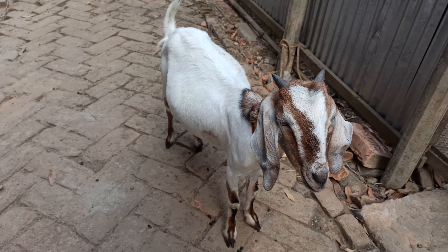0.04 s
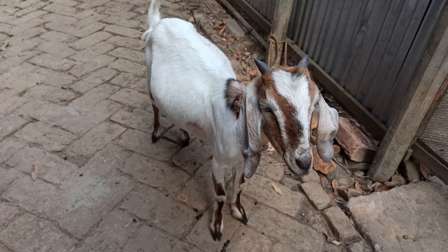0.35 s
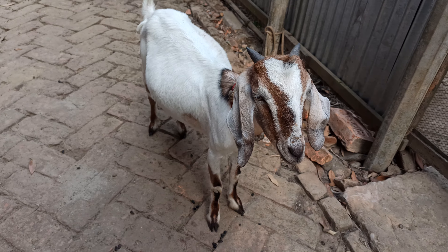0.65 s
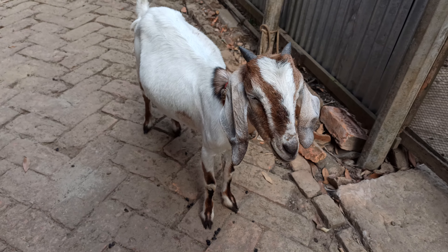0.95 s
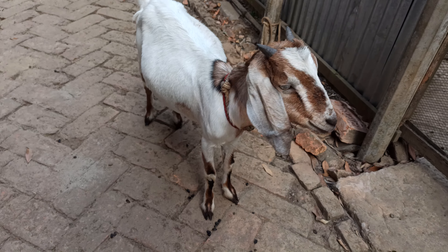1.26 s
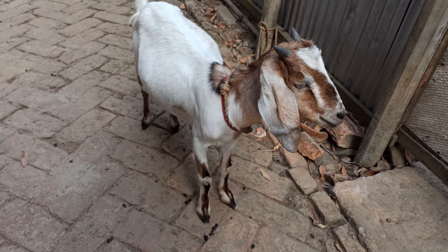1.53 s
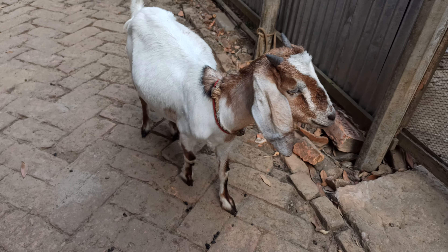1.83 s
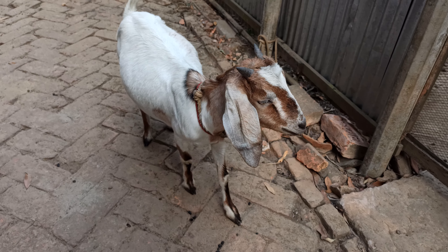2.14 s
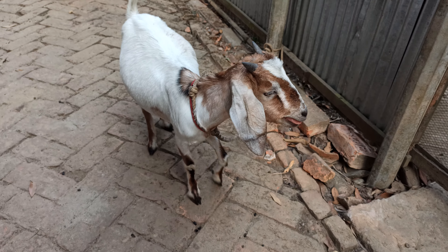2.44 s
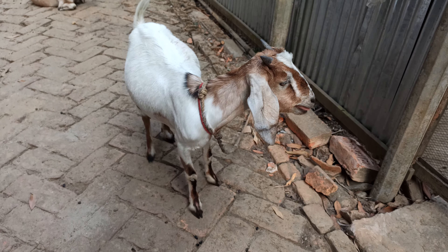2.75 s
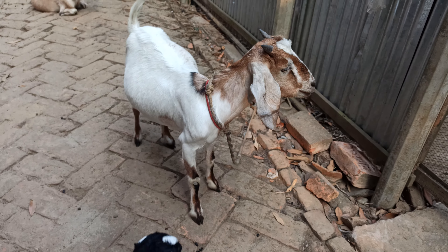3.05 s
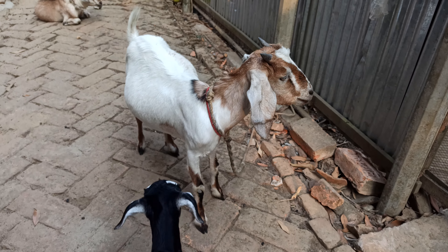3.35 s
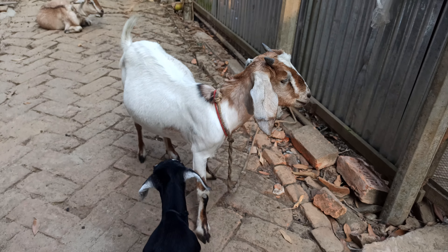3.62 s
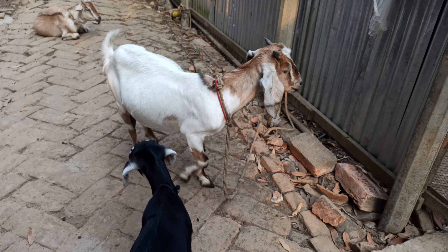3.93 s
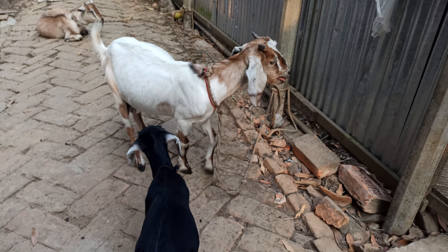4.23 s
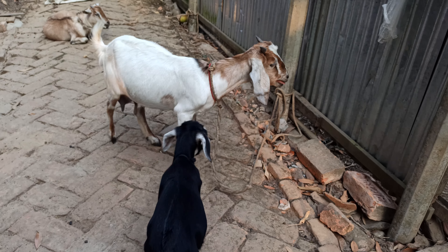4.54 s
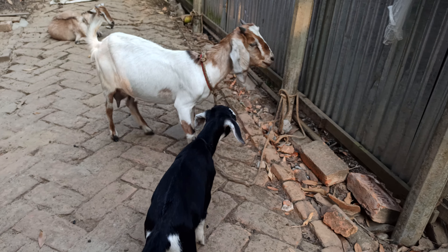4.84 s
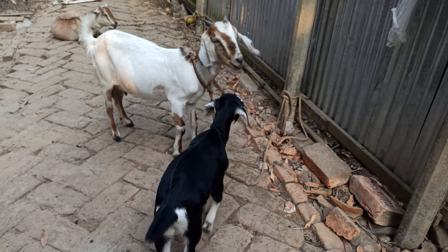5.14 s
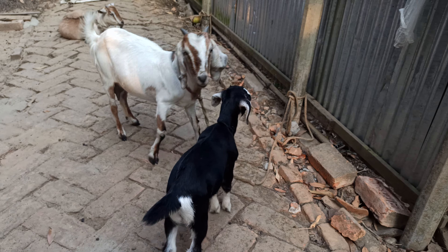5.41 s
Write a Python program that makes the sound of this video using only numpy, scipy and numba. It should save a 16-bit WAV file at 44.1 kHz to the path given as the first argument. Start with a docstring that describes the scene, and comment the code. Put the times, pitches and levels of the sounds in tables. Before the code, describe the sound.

Birds chirp and metal clinks lightly in a yard, then a nearby goat gives two quavering bleats.

```python
"""Goat in a brick-paved yard

A goat bleats twice, close to a hand-held phone. Each bleat is an arch of pitch shaken by a quaver,
which sweeps harmonics through the throat resonances as the mouth opens. Small birds twitter in gliding
notes, a bit of metal rings in short clinks, and hooves scuff and tap the bricks.
A low, distant rumble lies under it all, nearly alike at the phone's two microphone ports."""
import sys
import numpy as np
from scipy import signal
from scipy.fft import rfft, irfft, next_fast_len
from scipy.io import wavfile
from scipy.ndimage import uniform_filter1d
from numba import njit

SR = 44100
rng = np.random.default_rng(int(sys.argv[2]) if len(sys.argv) > 2 else 0)


def waveform_to_disk(signal):
    """Save audio, clipped to [-1, 1], as 16-bit WAV at the path in sys.argv[1]."""
    frames = np.transpose(np.atleast_2d(signal))
    scaled = np.clip(frames, -1, 1) * 32767
    samples = np.round(scaled).astype(np.int16)
    wavfile.write(sys.argv[1], SR, samples)


N = 246078
TIME = np.arange(N) / SR

# distant rumble and hiss: (frequency [Hz], relative level [dB])
AIR_COLOUR = [(15, -74.5), (25, -37), (101, -1.5), (183, -5), (281, -2.5), (322, -7.5), (410, -3.5),
              (445, -10), (919, -17), (1900, -26), (3930, -25.5), (5010, -31.5), (7500, -24), (9300, -43.5),
              (15500, -33)]
# how alike they are at the two ports: (frequency [Hz], correlation [0-1])
AIR_LIKENESS = [(50, 0.94), (500, 0.79), (1200, 0), (3000, 0), (15000, 0.015)]
# hooves dragging grit over the bricks: (time [s], decay time [s], level [dB])
SCUFFS = [(0, 0.037, -34.5), (.009, 0.0077, -26.5), (0.132, 0.0025, -29.5), (0.281, 0.027, -44.5),
          (0.328, 0.0061, -41), (0.624, 0.015, -42), (0.847, 0.0052, -41), (1.006, 0.005, -41),
          (2.056, 0.0057, -45), (2.085, 0.014, -42), (2.882, 0.029, -41), (3.441, 0.011, -51.5),
          (3.853, 0.0054, -44), (4.758, 0.0074, -47.5), (4.902, 0.03, -46.5), (4.959, 0.027, -47.5),
          (4.982, 0.017, -46)]
# spectrum of the grit: (frequency [Hz], relative level [dB])
GRIT_COLOUR = [(300, -12), (1000, -23), (2000, -11), (4000, 5), (5200, -4), (7000, 8.5), (9000, -6.5),
               (15000, -11.5)]
# birdsong, a high and a low note in turn, quick and falling, then slower and rising: (from [s],
# until [s], repeat [s], length [s], start pitch [Hz], end pitch [Hz], level [dB], step per repeat [dB])
SONG = [(0.011, .7, 0.11, 0.045, 7860, 6500, -43, -1), (0.095, .58, 0.097, 0.056, 4550, 4014, -49, 0),
        (0.735, 1.28, 0.2, 0.058, 3980, 4630, -45.5, -3), (0.81, 1.36, 0.23, 0.042, 6360, 6800, -46.5, -4)]
# far-off birds: (time [s], length [s], start pitch [Hz], end pitch [Hz], level [dB], trill spread [Hz])
WHISTLES = [(1.531, 0.26, 4420, 3880, -60, 233), (1.925, 0.12, 4000, 4350, -59.5, 382),
            (4.732, 0.31, 4440, 4417, -59.5, 300.6), (5.083, 0.128, 3910, 3900, -60, 60),
            (5.466, 0.091, 4100, 4180, -62, 148)]
# slight treble lift on the birds: (frequency [Hz], gain [dB])
BIRD_COLOUR = [(4200, 0), (7000, 1)]
# modes of a small metal piece: (frequency [Hz], level [dB], share of the clink's decay time [0-1])
METAL_MODES = [(2970, -24, 1), (3382, -11, 0.58), (3784, -8, 0.25), (4427, -8, 0.33), (6340, -16, 0.62),
               (7160, -27, 0.6), (7500, -20.5, 1), (8500, -20.5, 0.44), (12590, -19.5, 0.74)]
# its clinks: (time [s], level [dB], favoured frequency [Hz], decay time [s], left minus right [dB])
CLINKS = [(0.501, -13, 4740, 0.0048, -2.5), (0.6645, -16, 4290, 0.006, -5), (0.68, -34, 3300, 0.018, -1),
          (0.805, -38.5, 3500, 0.012, -10), (0.857, -37, 4300, 0.0064, -13), (0.898, -37, 3420, 0.011, 7),
          (1.019, -46.5, 3450, 0.018, -3), (1.056, -46.5, 3480, 0.0092, 6), (1.768, -45, 3620, 0.007, -2),
          (2.891, -30.5, 4040, 0.0048, -14), (2.937, -41, 3612, 0.011, -6),
          (3.101, -37.5, 3802, 0.0074, -12), (3.131, -40, 3860, 0.0082, -9), (0.96, -44, 4300, 0.0053, -5),
          (3.6258, -22.5, 4470, 0.0069, -6.5), (3.683, -34, 3730, 0.0065, -7),
          (3.718, -39, 3730, 0.0078, -7), (3.885, -45.5, 3950, 0.01, -10.5),
          (3.904, -48.5, 3620, 0.0093, -7), (3.928, -48, 3800, 0.0072, -8)]
# noise within a clink: (frequency [Hz], relative level [dB])
CRACK_COLOUR = [(1000, -42), (2400, -37), (3100, -4), (4400, -2), (5300, -8), (7200, 3.5), (12000, -1)]
# a hoof set down: (time [s], level [dB])
HOOF_KNOCKS = [(1.869, -55), (3.998, -41), (5.442, -52)]
# its dull spectrum: (frequency [Hz], relative level [dB])
KNOCK_COLOUR = [(200, -16), (800, 8), (1300, 0), (1750, -2), (2600, -10), (4300, -7), (7000, -16),
                (12000, -24)]
# each bleat's arch, before the quaver: (time [s], pitch [Hz], low vowel [dB], bright rasp [dB])
ARCH_1 = [(2.047, 244, -39, -48), (2.089, 262, -36.5, -36.5), (2.138, 264.9, -39.5, -35),
          (2.284, 411, -43.5, -46), (2.38, 453.4, -31, -31.5), (2.477, 465, -25.5, -33.5),
          (2.564, 500.8, -29.5, -32), (2.613, 419.1, -23.5, -25.5), (2.683, 441.8, -25, -32),
          (2.805, 352.6, -35, -34), (2.835, 308.4, -38.5, -48.5), (2.874, 226.4, -39.5, -50)]
ARCH_2 = [(4.02, 274.3, -47.5, -46), (4.096, 340, -39.5, -40.5), (4.122, 397.2, -33, -27.5),
          (4.195, 414.7, -37.5, -20.5), (4.26, 451.1, -37.5, -25), (4.348, 523.6, -30.5, -31.5),
          (4.444, 445.6, -29, -24), (4.481, 418.8, -28, -21), (4.497, 352.7, -41, -23),
          (4.601, 362.4, -32.5, -32.5), (4.64, 319.3, -37, -36.5), (4.675, 238, -33.5, -46.5),
          (4.711, 202.7, -40.5, -59)]
# beats of the quaver, each a squeeze that lifts the pitch: (letting go [s], rise [s], hold [s],
# fall [s], lift [semitones], vowel change [dB], rasp change [dB])
QUAVERS = [(2.17, 0.035, 0.03, 0.018, 3.5, 3.5, 1.5), (2.257, 0.055, 0.0054, 0.02, 4.0, 2, 5.5),
           (2.333, 0.045, 0.0065, 0.045, 4.3, 3.5, 10.5), (2.447, 0.042, 0.016, 0.018, 4.5, -3, 5.5),
           (2.538, 0.026, 0.03, 0.014, 3.3, -7, -4), (2.589, 0.018, 0.0028, 0.012, 3.0, -5, -8),
           (2.648, 0.022, 0.0042, 0.023, 3.4, -6, -9), (2.699, 0.014, 0.0051, 0.025, 1.8, -1, -4),
           (2.766, 0.025, 0.0069, 0.014, 1.1, 1.3, -1.5), (4.073, 0.023, 0.00732, 0.016, 2.5, 5, -4.5),
           (4.15, 0.018, 0.0051, 0.016, 3.7, -5.5, -2.5), (4.237, 0.023, 0.029, 0.014, 3.1, 5.5, -0.8),
           (4.302, 0.027, 0.0099, 0.029, 3.5, 10.5, 1.5), (4.375, 0.02, 0.012, 0.029, 2.6, 4, 0.5),
           (4.417, 0.026, 0.012, 0.014, 4.3, 3, -14.5), (4.471, 0.02, 0.0034, 0.013, 1.5, -1.5, -7.5),
           (4.565, 0.056, 0.036, 0.014, 2.6, 6, -2.5)]
# catches, where the throat nearly shuts: (time [s], half length [s], depth [dB])
CATCHES = [(2.109, 0.017, -21.5), (2.276, 0.01, -14.5), (2.446, 0.0085, -11), (4.208, 0.0063, -4.5),
           (4.247, 0.0045, -5.5), (4.27, 0.005, -3.5), (4.429, 0.0037, -15.5), (4.473, 0.0034, -12)]
# the mouth through each bleat: (time [s], opening [0-1], roughness [0-1], nasal ring [dB],
# nasal resonance [Hz], upper ring [dB], upper throat resonance [Hz])
MOUTH_1 = [(2.049, 0.12, 0.25, -13, 2100, 11, 3750), (2.2, 0.07, 0.11, 10.5, 2155, 5.5, 3320),
           (2.292, 0.02, 0.06, 14.5, 1770, 12.5, 3570.0), (2.32, 0, 0.01, 30, 2120, 10, 4200),
           (2.355, 0, 0.06, 31, 2100, 12, 3560), (2.385, 0.65, 0, 17.5, 2110, 13, 3800),
           (2.42, 0.2, 0, 23.5, 2120, 11, 4100), (2.475, 0.79, 0.01, 11.5, 2240, 3.5, 3200),
           (2.52, 0.27, 0, 19.5, 2260, -2, 3454), (2.562, 0.61, 0, 19, 2170, 3, 3200),
           (2.615, 0.98, 0, 17.5, 2080, 18, 3418), (2.675, 0.77, 0.06, 6, 2230, 8.5, 3990),
           (2.76, 0.99, 0, -0.5, 2237, 4, 3950), (2.809, 0.94, 0, 4, 2244, 2, 3550),
           (2.87, 0.63, 0.24, -5, 2250, -2, 3642)]
MOUTH_2 = [(4.02, 0.14, 0.26, -11, 1760, 7.3, 3740), (4.089, 0.28, 0.29, -18, 1960, 13, 3770),
           (4.125, 0.46, 0.4, 8, 2120, 18, 3470), (4.18, 0.52, 0.31, 10, 2195, 10.6, 3400),
           (4.23, 0.2, 0.18, 13, 2200, 8.9, 3430), (4.27, 0.29, 0.27, 17, 2190, 7.5, 3390),
           (4.32, 0.15, 0.15, 12.5, 2170, 5, 3430), (4.39, 0.28, 0.069, 13.5, 2230, 6, 3700),
           (4.446, 0.64, 0.09, 26, 1920, 9.4, 3100), (4.492, 0.5, 0.26, 13, 2200, 18, 3230),
           (4.541, 0.86, 0.1, 12, 2106, 11.2, 3170), (4.574, 0.76, 0.12, 10, 2192, 9, 3327),
           (4.6, 0.94, 0.22, 13, 2310, 10.4, 3886), (4.71, 0.97, 0.52, -2, 2240, 9.3, 3957)]
# throat colour in each bleat, mouth half open and wide open: (frequency [Hz], gain [dB])
HALF_OPEN_1 = [(280.0, 12), (430.0, 0.5), (560.0, 10.5), (700.0, 0.5), (870.0, -6), (1150.0, 1.6),
               (1400.0, -8.5), (1700.0, 0.5), (2100.0, -19.5), (2600.0, -9.5), (3000.0, -6), (3450.0, -3.5),
               (4100.0, -10.5), (4600.0, -9), (5200.0, -22.5), (7300.0, -12.5), (12000.0, -54),
               (15000.0, -34.5)]
WIDE_OPEN_1 = [(280.0, -38.5), (430.0, -6), (560.0, 4.5), (700.0, 10.5), (870.0, 24.5), (1150.0, -7.5),
               (1400.0, -6.5), (1700.0, -3), (2100.0, -10), (2600.0, -5), (3000.0, -1.5), (3450.0, -8),
               (4100.0, -7), (4600.0, -5.5), (5200.0, -20), (7300.0, -27), (12000.0, -39.5), (15000.0, -43)]
HALF_OPEN_2 = [(280.0, 4.5), (430.0, -9), (560.0, 6), (700.0, 3.5), (870.0, -14.5), (1150.0, 1),
               (1400.0, -17), (1700.0, -3), (2100.0, -3.5), (2600.0, -8.5), (3000.0, -2), (3450.0, -5.5),
               (4100.0, -4), (4600.0, -8), (5200.0, -18), (7300.0, -15), (12000.0, -46), (15000.0, -46)]
WIDE_OPEN_2 = [(280.0, -4), (430.0, -31.5), (560.0, -7), (700.0, 15.5), (870.0, 19), (1150.0, -16),
               (1400.0, -1.5), (1700.0, -8.5), (2100.0, -16), (2600.0, -11), (3000.0, -3), (3450.0, -5),
               (4100.0, -10.5), (4600.0, -5.5), (5200.0, -20), (7300.0, -20.5), (12000.0, -53),
               (15000.0, -45.5)]
# treble sizzle of each bleat: (time [s], level [dB])
SIZZLE_1 = [(2.047, -52), (2.12, -60), (2.145, -40.5), (2.199, -52), (2.24, -47), (2.285, -65), (2.33, -51),
            (2.4, -49), (2.47, -45.5), (2.53, -50), (2.57, -41), (2.61, -45), (2.645, -48), (2.675, -50),
            (2.79, -52.5), (2.87, -54)]
SIZZLE_2 = [(4.02, -52.5), (4.09, -53.5), (4.13, -44), (4.19, -38), (4.27, -42), (4.39, -42.5),
            (4.415, -49), (4.44, -42), (4.47, -47), (4.492, -32.5), (4.53, -47), (4.6, -44), (4.65, -48.5),
            (4.71, -62)]
# shadow between the two ports: (frequency [Hz], left minus right [dB])
PORT_SHADOW = [(300, 1.5), (800, 1), (1300, 4), (2400, 0), (4400, -5), (8000, -4), (15000, -1)]
# the goat's echoes, bright nearby and dull from further off: (frequency [Hz], gain [dB])
NEAR_ECHO = [(500, -17.5), (1000, 3.5), (2000, 1), (4000, -1.5), (8000, -4)]
FAR_ECHO = [(300, -8), (800, -17), (2000, -7.5), (5000, -14)]


def undb(db):
    """Decibels to gain."""
    return 10 ** (np.asarray(db) / 20)


def unit(x):
    """Scale to rms 1."""
    return x / np.sqrt(np.mean(x ** 2))


def shape_at(hz, points):
    """Read (frequency, value) points on a log-frequency axis."""
    f, value = np.transpose(points)
    return np.interp(np.log(hz + 1), np.log(f), value)


def filtered(x, gain):
    """Filter by a gain that is a function of frequency."""
    size = next_fast_len(x.shape[-1] + 4096)
    return irfft(rfft(x, size) * gain(np.fft.rfftfreq(size, 1 / SR)), size)[..., :x.shape[-1]]


def colour(x, points):
    """Filter by a table of (frequency [Hz], gain [dB])."""
    return filtered(x, lambda hz: undb(shape_at(hz, points)))


def wander(n, rate):
    """Smooth random drift with spread 1 that changes about rate times a second."""
    return unit(filtered(rng.standard_normal(n), lambda hz: 1 / (1 + (hz / rate) ** 2)))


def add(out, s, x):
    """Mix x into out from time s on."""
    i = max(int(s * SR), 0)
    out[..., i:i + x.shape[-1]] += x[..., :N - i]


def yard(x, t60, gap_s):
    """Scattered echoes from paving, fence and walls, different at each port."""
    t = TIME[:SR]
    tail = rng.standard_normal((2, SR)) * undb(-60 * t / t60) * (t > gap_s)
    tail /= np.sqrt(np.sum(tail ** 2, axis=1, keepdims=True))
    return signal.fftconvolve(np.atleast_2d(x), tail, axes=1)[:, :N]


def background(air_db=-50.5, drone_hz=113, drone_db=-59.5):
    """Distant rumble, nearly alike at both ports, with a faint low drone and a smooth hiss."""
    mid, side = rng.standard_normal((2, N))
    mid = filtered(mid, lambda hz: np.sqrt(1 + shape_at(hz, AIR_LIKENESS)))
    side = filtered(side, lambda hz: np.sqrt(1 - shape_at(hz, AIR_LIKENESS)))
    air = unit(colour(np.array([mid + side, mid - side]), AIR_COLOUR))
    air *= undb(air_db + 0.36 * wander(N, 7.5))
    drone = np.sin(2 * np.pi * np.cumsum(drone_hz + 4 * wander(N, 6.2)) / SR)
    return air + drone * undb(drone_db + wander(N, 5.6))


def hoof_scuffs(grain_db=3.5):
    """A hoof scrapes the bricks in a dying shower of gritty clicks."""
    out = np.zeros((2, N))
    for s, decay_s, db in SCUFFS:
        age = TIME[:int(4 * decay_s * SR)] / decay_s
        grains = rng.standard_normal((2, len(age))) * undb(grain_db * wander(len(age), 600))
        add(out, s, undb(db) * unit(colour(grains, GRIT_COLOUR)) * np.exp(-age))
    return out + undb(-6) * yard(out, t60=0.2, gap_s=0.0083)


def bird_note(length, start_hz, end_hz, trill_hz):
    """A glide that levels off, made scratchy by a fast, uneven trill."""
    along = np.linspace(0, 1, int(length * SR))
    glide_hz = start_hz + (end_hz - start_hz) * np.sin(along * np.pi / 2)
    hz = glide_hz + trill_hz * wander(len(along), 590)
    return np.sin(2 * np.pi * np.cumsum(hz) / SR) * signal.windows.tukey(len(along), 0.4)


def birds():
    """A scratchy song and faint whistles from further off reach the phone as echoes."""
    song = np.zeros(N)
    for first, until, repeat, length, start_hz, end_hz, db, fade_db in SONG:
        for k, s in enumerate(np.arange(first, until, repeat)):
            stray = 1 + 0.015 * rng.standard_normal(2)  # no two notes glide alike
            note = bird_note(length, start_hz * stray[0], end_hz * stray[1], trill_hz=210)
            add(song, s, undb(db + k * fade_db) * note)
    for s, length, start_hz, end_hz, db, trill_hz in WHISTLES:
        add(song, s, undb(db) * bird_note(length, start_hz, end_hz, trill_hz))
    song = colour(song, BIRD_COLOUR)
    near = undb(-0.5) * yard(song, t60=0.034, gap_s=0)
    far = undb(2) * yard(song, t60=0.87, gap_s=0.003)
    return (near + far) * undb([[-1.5], [1.5]])  # a little to the right


def metal_clinks(favour=5.5, favour_width_hz=330, attack_s=0.00095, crack_db=-19, rattle_db=5):
    """A small metal piece knocks; where it is struck decides which of its modes rings most."""
    out = np.zeros((2, N))
    t = TIME[:SR // 5]
    for s, db, favoured_hz, decay_s, pan_db in CLINKS:
        tone = 0
        for hz, mode_db, ring_share in METAL_MODES:
            gain = undb(mode_db + 2 * rng.standard_normal())
            gain *= 1 + favour * np.exp(-((hz - favoured_hz) / favour_width_hz) ** 2)
            # light knocks hardly wake the highest modes
            gain /= (1 + (hz / 8500) ** 6) ** np.clip((-22 - db) / 16, 0, 1)
            detune = 1 + 0.008 * rng.standard_normal()
            tone += gain * np.sin(2 * np.pi * hz * detune * t) * np.exp(-t / (decay_s * ring_share))
        crack = unit(colour(rng.standard_normal((2, len(t))), CRACK_COLOUR))
        lightness = np.clip((-24 - db) / 16, 0, 1)  # light knocks rattle more
        crack *= undb(crack_db + rattle_db * lightness) * np.exp(-t / (0.61 * decay_s))
        port_gains = undb(db + np.array([[pan_db], [-pan_db]]) / 2)
        add(out, s, (tone + crack) * (1 - np.exp(-t / attack_s)) * port_gains)
    far = undb(-16) * yard(out, t60=0.28, gap_s=0.0069)
    near = undb(-3) * yard(out, t60=0.043, gap_s=0.0013)
    return out + near + far


def hoof_knocks(decay_s=0.0068):
    """A hoof meets the bricks with a short, dull tap."""
    out = np.zeros(N)
    t = TIME[:SR // 20]
    for s, db in HOOF_KNOCKS:
        tap = unit(colour(rng.standard_normal(len(t)), KNOCK_COLOUR))
        add(out, s, undb(db) * tap * np.exp(-t / decay_s))
    return out + undb(2) * yard(out, t60=0.2, gap_s=0.005)


def quaver(t):
    """Squeezes rise, hold and let go, changing the pitch, the vowel level and the rasp level."""
    return sum(np.outer(changes, np.interp(t, [s - hold - rise, s - hold, s, s + fall], [0, 1, 1, 0]))
               for s, rise, hold, fall, *changes in QUAVERS)


def effort(t, arch, throat_hz=842, width_hz=119):
    """Pitch, vowel level and rasp level: the arch, shaken by the quaver and broken by catches."""
    s, *columns = np.transpose(arch)
    hz, vowel_db, rasp_db = (np.interp(t, s, c) for c in columns)
    semitones, vowel_beat_db, rasp_beat_db = quaver(t)
    hz *= 2 ** (semitones / 12)
    catch_db = sum(db * np.exp(-((t - when) / half_s) ** 2) for when, half_s, db in CATCHES)
    # the vowel swells as the second or third harmonic crosses the lowest throat resonance
    second, third = (np.exp(-((k * hz - throat_hz) / width_hz) ** 2) for k in (2, 3))
    swell_db = 11.5 * second + 8.5 * third
    return hz, vowel_db + vowel_beat_db + catch_db + swell_db, rasp_db + rasp_beat_db + catch_db


def fold_pulses(hz, phase, flutter_db, top_hz=15750):
    """The vocal folds' pulse keeps changing shape, so each overtone swells and fades on its own."""
    pulses = 0
    for k in range(1, 41):
        harmonic_db = flutter_db * min(k / 8, 1) * wander(len(hz), 35)
        pulses += np.cos(k * phase) * (k * hz < top_hz) * undb(harmonic_db)
    return unit(pulses)


def ring(hz, centre_hz, width_hz):
    """Response of one resonance, gain 1 at its centre."""
    return 1j * hz * width_hz / (centre_hz ** 2 - hz ** 2 + 1j * hz * width_hz)


@njit
def moving_ring(x, hz, width_hz):
    """Pass x through a resonance whose centre moves, gain 1 at the centre."""
    y, band, low = np.empty(len(x)), 0., 0.
    for i in range(len(x)):
        tuning, damping = np.tan(np.pi * hz[i] / SR), width_hz / hz[i]
        ringing = (band + tuning * (x[i] - low)) / (1 + tuning * (tuning + damping))
        band, low = 2 * ringing - band, low + 2 * tuning * ringing
        y[i] = damping * ringing
    return y


def throat(voice, nasal_db, nasal_hz, upper_db, upper_hz):
    """The nasal and upper throat resonances move with jaw and tongue."""
    voice = voice + undb(nasal_db) * moving_ring(voice, nasal_hz, width_hz=91.0)
    voice = voice + undb(upper_db) * moving_ring(voice, upper_hz, width_hz=260.0)
    # the long throat delays its resonances and so spreads each pulse
    for formant_hz, width_hz in [(880, 450), (2150, 1100), (3400, 410)]:
        voice = filtered(voice, lambda f: 1 - 2 * ring(f, formant_hz, width_hz))
    # the nose takes a little out of a narrow band just above the vowel
    return filtered(voice, lambda f: 1 - 0.19 * ring(f, 1442, width_hz=280))


def at_level(x, db):
    """Make a sound's short-term rms follow a level curve."""
    power = uniform_filter1d(uniform_filter1d(x ** 2, size=400), size=300)
    return x / np.sqrt(np.abs(power) + 1e-12) * undb(db)


def bleat(arch, mouth, sizzle, half_open, wide_open, attack_s, flutter_db, jitter, shimmer, split,
          breath, growl, sag_s=0.14, release_s=0.043):
    """Vocal-fold pulses and puffs of turbulence ring the throat as the mouth opens."""
    start, end = arch[0][0], arch[-1][0]
    t = np.arange(start, end + 0.1, 1 / SR)
    hz, vowel_db, rasp_db = effort(t, arch)
    when, *controls = np.transpose(mouth)
    opening, rough, *resonances = (np.interp(t, when, c) for c in controls)
    # as the air runs out the voice sags and dies away
    spent_s = np.maximum(t - end, 0)
    hz *= np.exp(-spent_s / sag_s)
    envelope = np.minimum((t - start) / attack_s, 1) * np.exp(-spent_s / release_s)
    # the folds glide round each turn, and no two cycles are quite alike
    hz = uniform_filter1d(hz, size=150) * (1 + jitter * rough * wander(len(t), 130))
    phase = 2 * np.pi * np.cumsum(hz) / SR
    pulses = fold_pulses(hz, phase, flutter_db)
    # when rough, the level flickers and a second, slower vibration splits each harmonic
    pulses *= 1 + rough * (shimmer * wander(len(t), 88) + split * np.cos(0.24 * phase))
    # turbulence comes once a cycle and takes over in the treble
    puffs = unit(rng.standard_normal(len(t)) * (1 + np.cos(phase)))
    hiss = colour(puffs, [(600, -14), (2000, -7), (4000, -5), (6000, 8), (8000, 10), (12000, 24),
                          (15000, 18)])
    source = pulses + breath * (rough + 0.18) * hiss
    voice = (1 - opening) * colour(source, half_open) + opening * colour(source, wide_open)
    voice = throat(voice, *resonances)
    # the low vowel, the bright rasp and the treble sizzle each swell to their own level
    vowel = filtered(voice, lambda f: 1 / (1 + (f / 1450) ** 16))
    treble = filtered(voice, lambda f: 1 - 1 / (1 + (f / 5100) ** 24))
    out = at_level(vowel, vowel_db)
    out += at_level(voice - vowel - treble, rasp_db + 6 * rough * wander(len(t), 45))
    out += at_level(treble, np.interp(t, *np.transpose(sizzle)))
    # a cracking voice also rings the low resonances between its harmonics
    cracked = unit(filtered(puffs, lambda f: ring(f, 580, 55) ** 2 + 0.54 * ring(f, 890, 130) ** 2))
    out += growl * rough * (1 - 0.85 * opening) * cracked * undb(vowel_db)
    # the voice carries no deep bass
    return filtered(out * envelope, lambda f: f ** 4 / (f ** 4 + 170 ** 4))


def at_ports(voice, lag_radians=1.6):
    """Each port is shadowed differently; treble bends round the phone and reaches the left one late."""
    def left_gain(hz):
        lag = lag_radians * np.tanh((hz / 2400) ** 2)
        return undb(shape_at(hz, PORT_SHADOW) / 2) * np.exp(-1j * lag)
    right = filtered(voice, lambda hz: undb(-shape_at(hz, PORT_SHADOW) / 2))
    return np.array([filtered(voice, left_gain), right])


def shifting_yard(x, t60, gap_s, turn_hz):
    """Near echoes whose pattern keeps changing as the head turns."""
    weights = np.array([wander(N, turn_hz) for _ in range(3)])
    weights /= np.sqrt(np.sum(weights ** 2, axis=0))
    return sum(w * yard(x, t60, gap_s) for w in weights)


def goat():
    """Two bleats close to the phone, the second harsher, echo round the yard."""
    first = bleat(ARCH_1, MOUTH_1, SIZZLE_1, HALF_OPEN_1, WIDE_OPEN_1, attack_s=0.003, flutter_db=4.5,
                  jitter=0.017, shimmer=1.0, split=0.15, breath=1.0, growl=0.24)
    second = bleat(ARCH_2, MOUTH_2, SIZZLE_2, HALF_OPEN_2, WIDE_OPEN_2, attack_s=0.013, flutter_db=3.5,
                   jitter=0.0213, shimmer=0.83, split=0.38, breath=0.57, growl=0.95)
    voice = np.zeros(N)
    add(voice, ARCH_1[0][0], first)
    add(voice, ARCH_2[0][0], second)
    direct = at_ports(voice)
    # rubble and the ribs of the fence scatter only the short waves
    scattered = filtered(colour(direct, NEAR_ECHO), lambda hz: hz ** 4 / (hz ** 4 + 1150 ** 4))
    near = shifting_yard(scattered, t60=0.035, gap_s=0.00042, turn_hz=4.3)
    far = yard(colour(voice, FAR_ECHO), t60=0.43, gap_s=0.021)
    return direct + near + far


def scene():
    """The goat up close, with metal, birds and hooves, over the distant rumble."""
    return goat() + metal_clinks() + birds() + hoof_scuffs() + hoof_knocks() + background()


def record(dry, notch_hz=(8400, 11600), leak_db=-39, top_hz=15750):
    """The phone has a deep notch in the high treble and cuts the top."""
    notch = signal.cheby1(8, 0.3, notch_hz, "bandstop", fs=SR, output="sos")
    top = signal.ellip(8, 0.2, 70, top_hz, fs=SR, output="sos")
    return signal.sosfilt(top, signal.sosfilt(notch, dry) + undb(leak_db) * dry)


dry = scene()
out = record(dry)
waveform_to_disk(out)
```